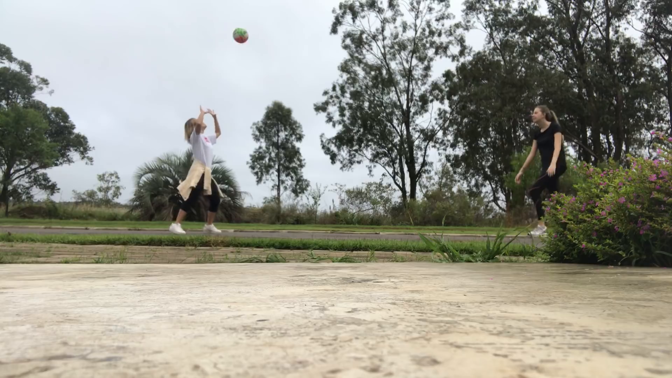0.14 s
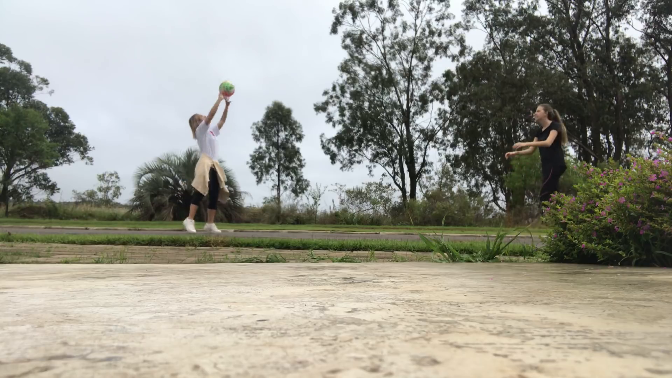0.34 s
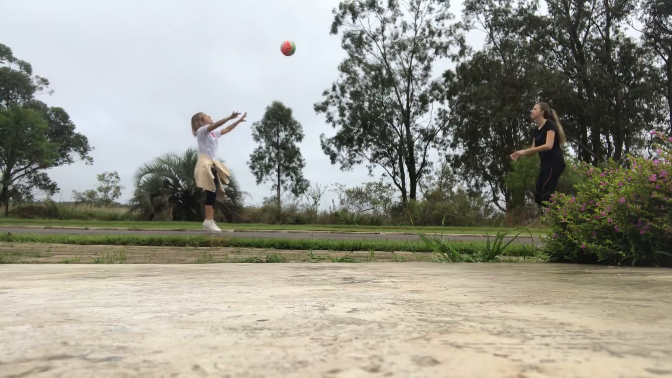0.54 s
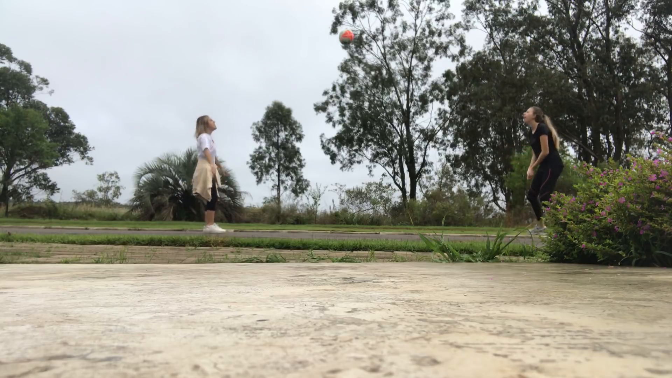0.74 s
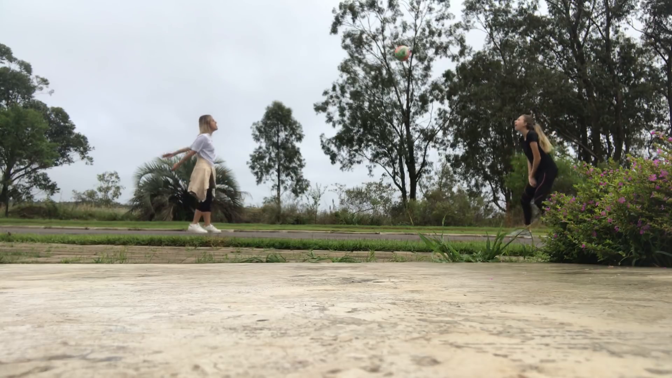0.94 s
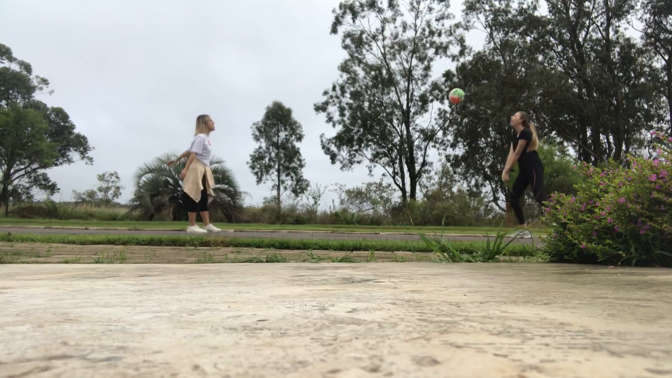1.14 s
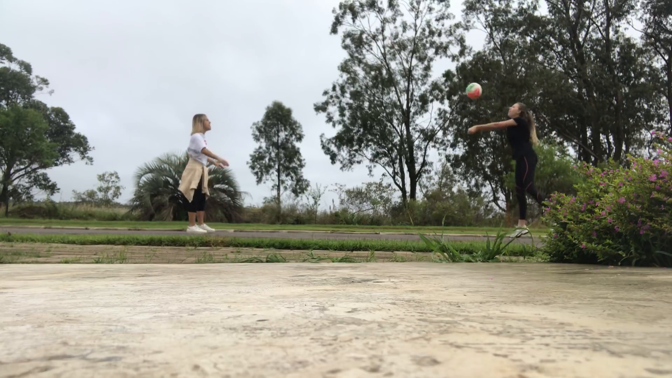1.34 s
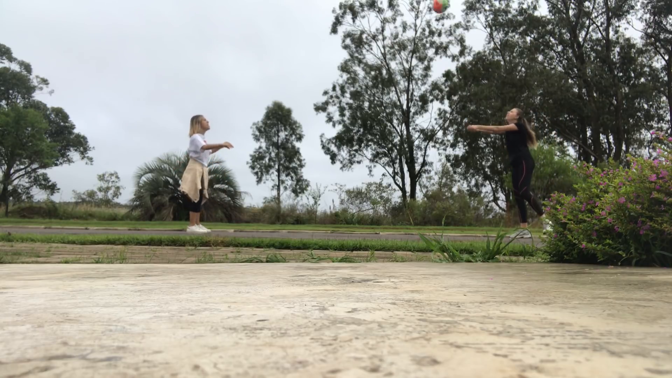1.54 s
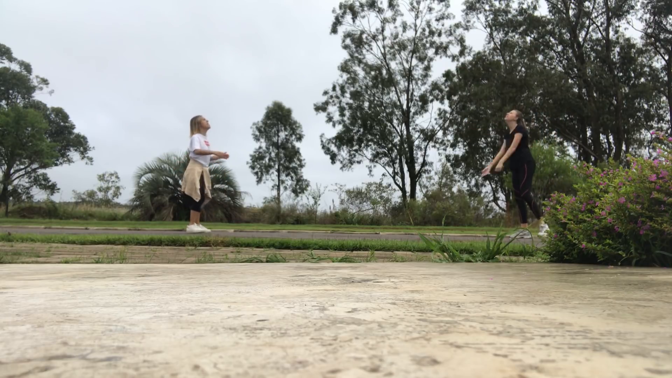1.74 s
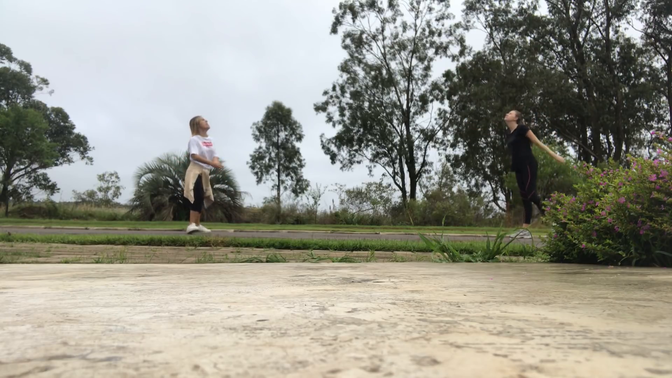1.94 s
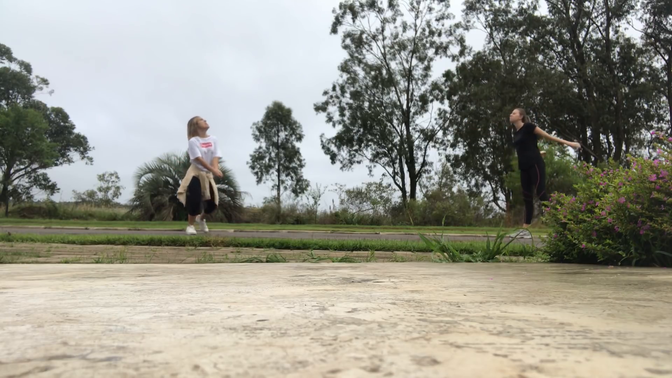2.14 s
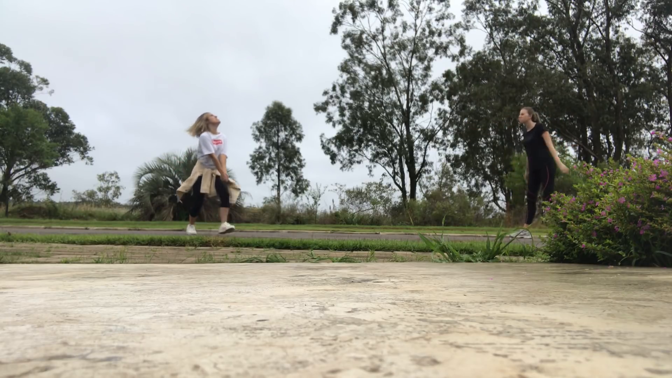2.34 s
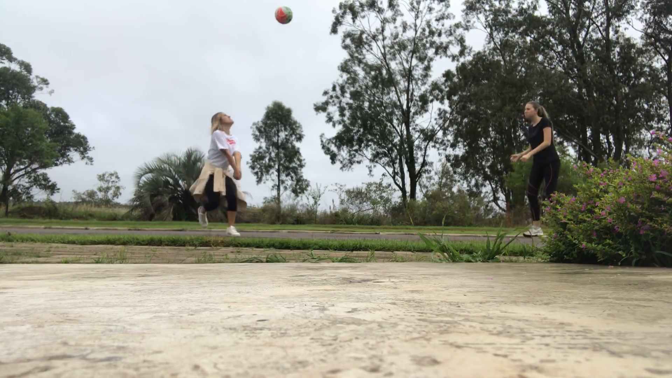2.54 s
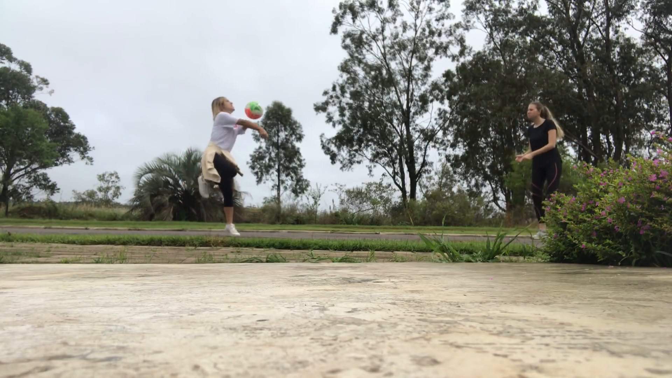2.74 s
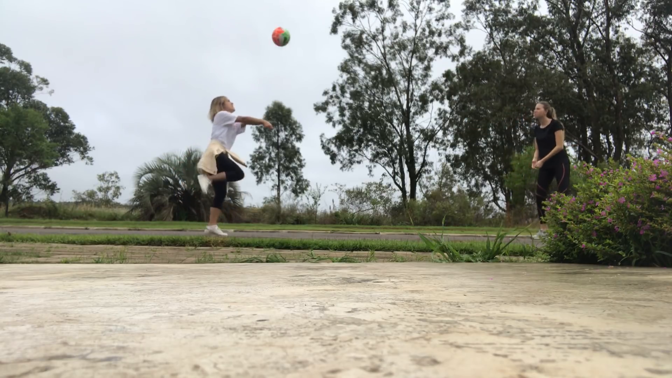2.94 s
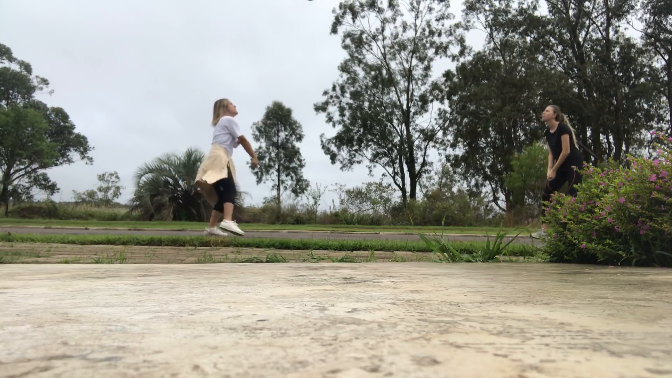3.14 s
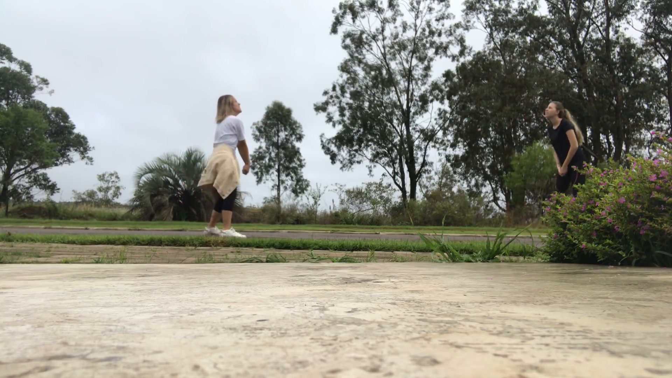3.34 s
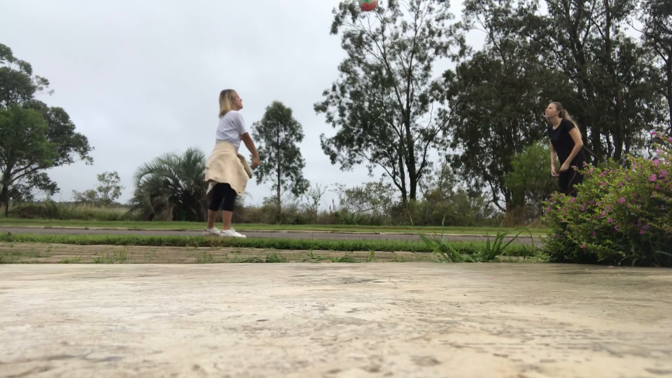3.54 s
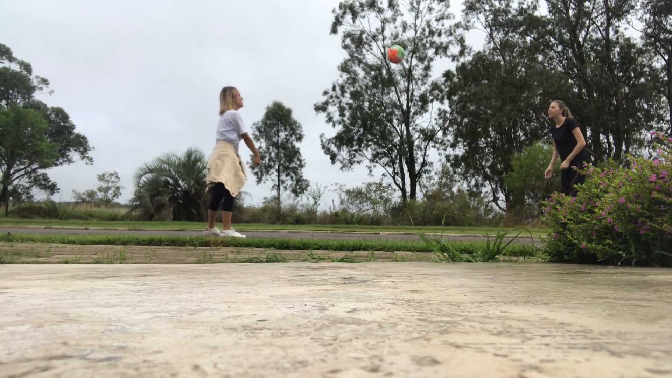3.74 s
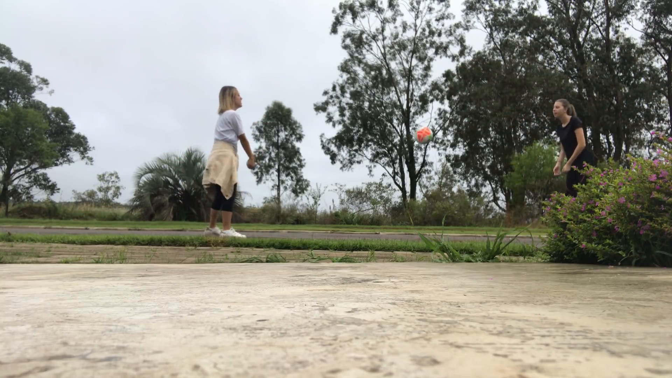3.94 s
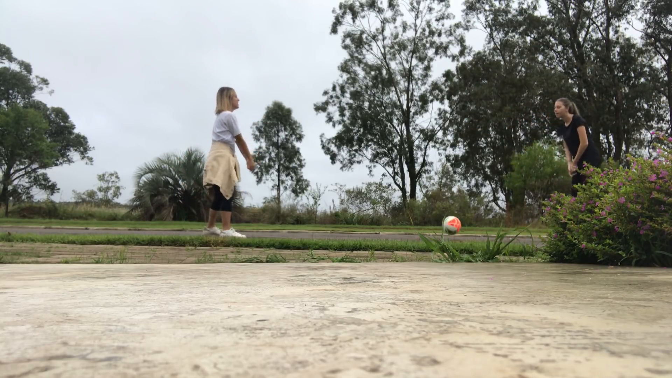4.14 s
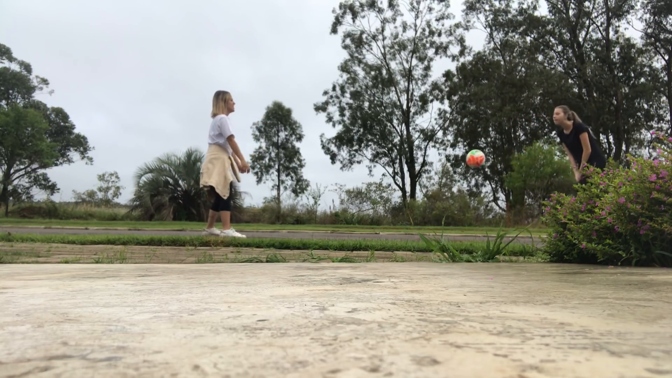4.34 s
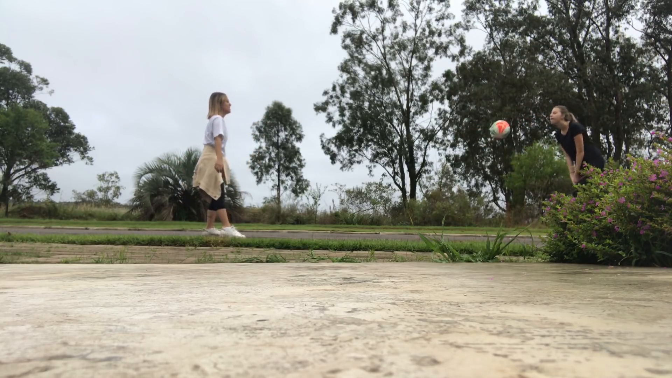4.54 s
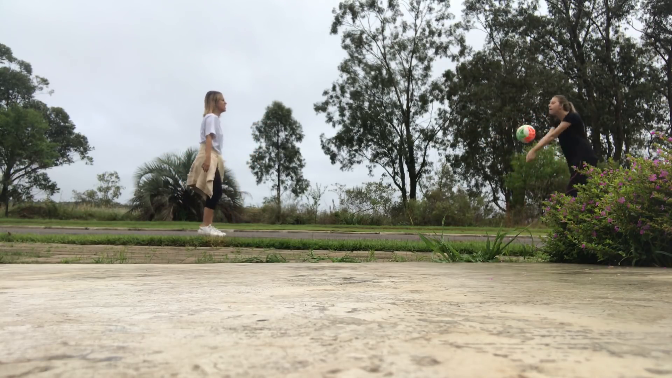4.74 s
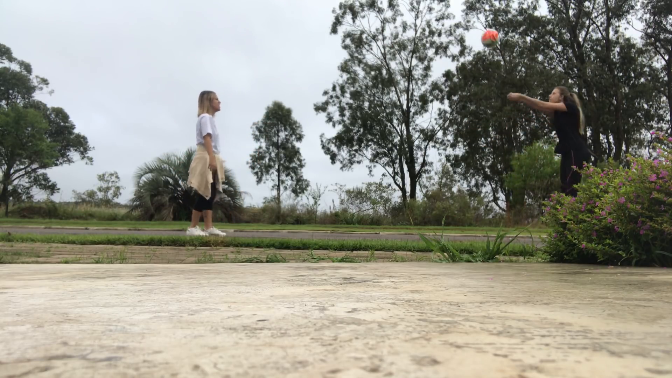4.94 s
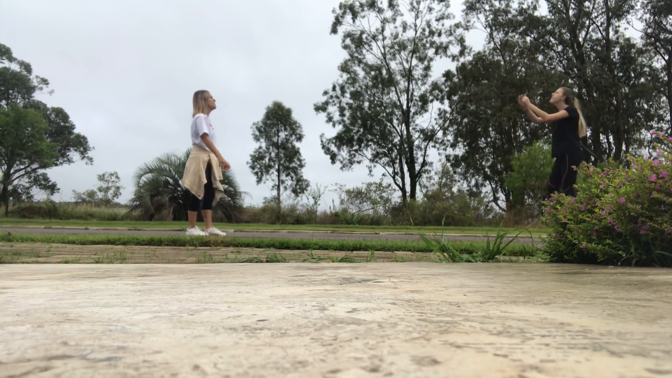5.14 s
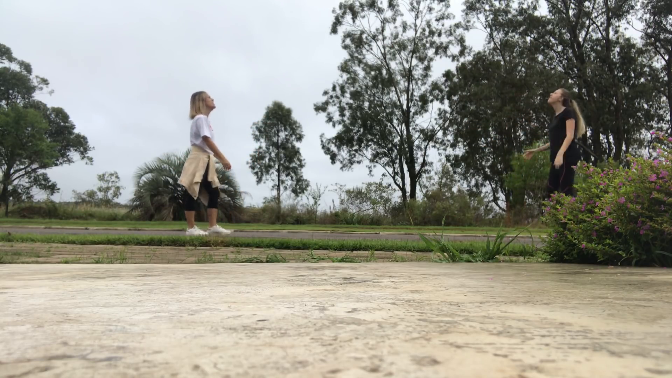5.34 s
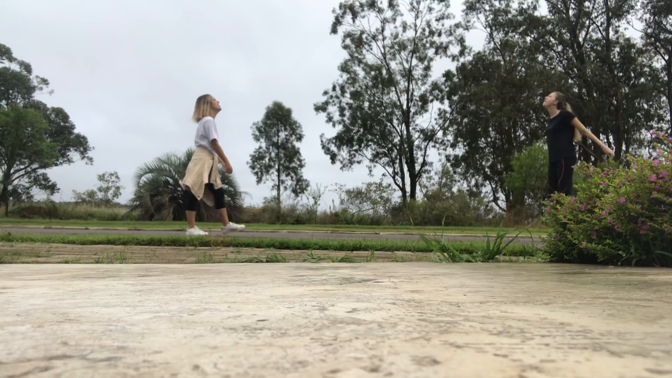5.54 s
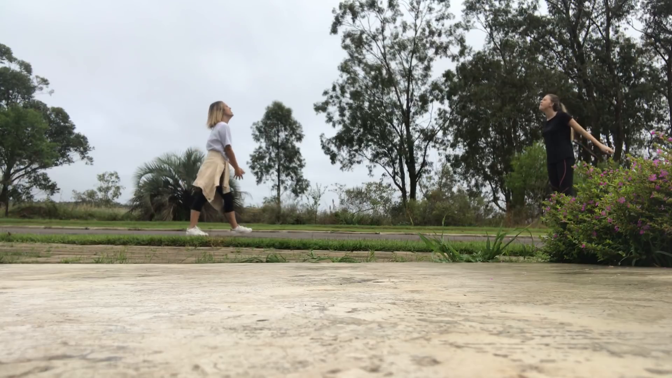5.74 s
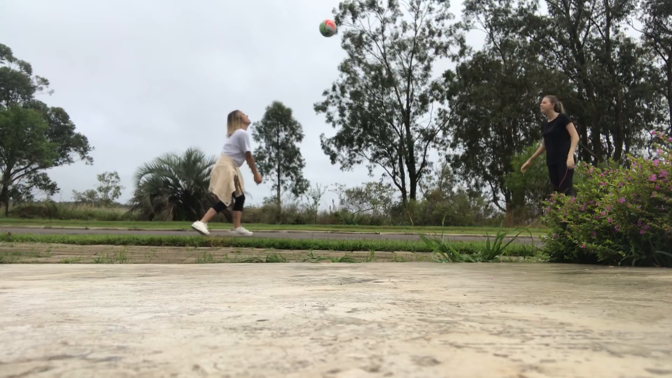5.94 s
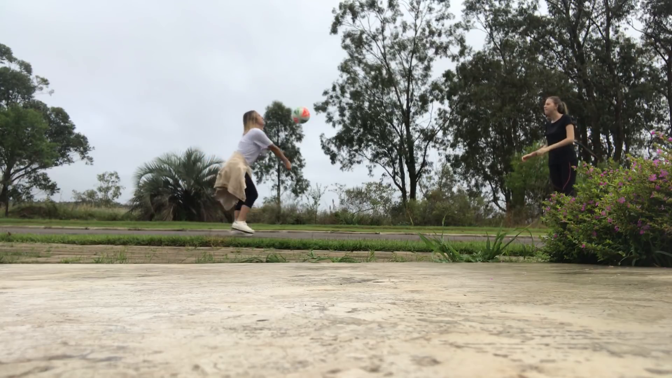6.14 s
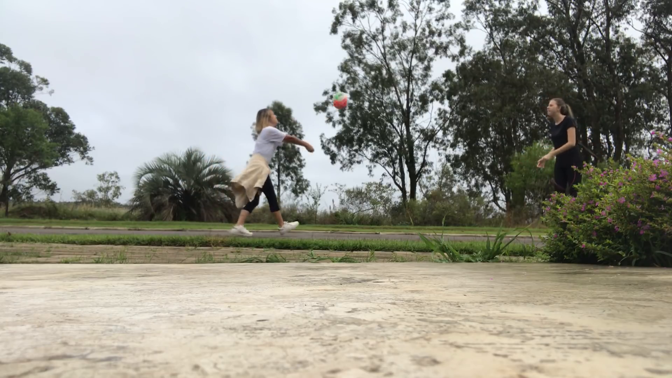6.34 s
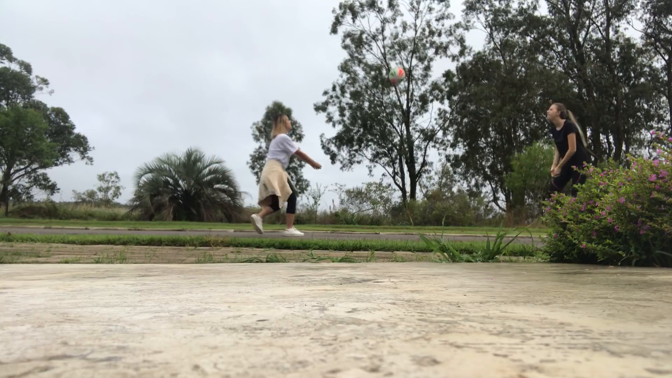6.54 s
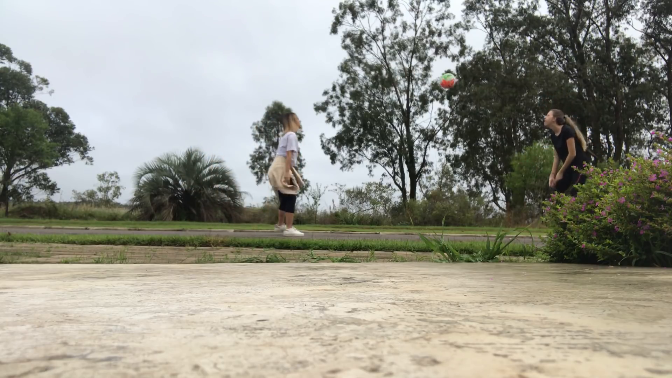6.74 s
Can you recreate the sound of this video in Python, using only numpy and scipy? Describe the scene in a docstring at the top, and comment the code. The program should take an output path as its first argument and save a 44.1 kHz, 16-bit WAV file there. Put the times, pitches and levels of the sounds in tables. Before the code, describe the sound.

Over a quiet, low outdoor rumble, a volleyball is struck six times at an easy pace: first softly by fingertips, then with sharp, thumping slaps off forearms, with a single bounce on paving midway. A nearby wall and far trees throw back brief echoes. Light, gritty footsteps fill the gaps, and thin, high bird whistles come now and then from far off.

```python
"""Volleyball on open paving

Two players pass a volleyball: a fingertip set, forearm bumps and one bounce on the ground.
Each blow slaps the skin, thumps the shell and rings the air inside; a near wall and far trees
throw it back. Shoes scuff between passes and a small bird whistles over a low outdoor rumble."""
import sys
import numpy as np
from scipy import signal
from scipy.fft import rfft, irfft
from scipy.io import wavfile
from scipy.ndimage import uniform_filter1d

SR = 44100
rng = np.random.default_rng(int(sys.argv[2]) if len(sys.argv) > 2 else 0)


def dump(signal):
    """Clip the signal to [-1, 1] and save it as 16-bit WAV at the path in sys.argv[1]."""
    limited = np.clip(np.atleast_2d(signal).T, -1, 1)
    pcm = np.round(limited * 32767).astype(np.int16)
    wavfile.write(sys.argv[1], SR, pcm)


N = 304290

# tone of the outdoor bed and of the lingering hiss: (frequency [Hz], level [dB])
RUMBLE_EQ = [(13, -71), (22, -33.5), (40, -12.5), (59, 1), (76, -1), (97, -6.5), (168, -12), (209, -15.5),
             (244, -16), (300, -21), (390, -49.5), (660, -120)]
AIR_EQ = [(180, -24), (300, -0.5), (404, -2.5), (477, -8.5), (665, -8.5), (812, -14.5), (974, -13.5),
          (1550, -18.5), (2090, -22), (2910, -22), (4950, -25), (6040, -24), (10400, -32), (14300, -30),
          (15800, -34)]
HISS_EQ = [(200, -2), (800, 5.5), (2000, -3), (3800, 0.5), (5000, -5), (6500, -1.5), (8500, -6),
           (10300, -10.5), (13000, -7.5), (15700, -14.5), (16300, -43.5)]
# a soft hiss hangs on after two of the passes: (start [s])
HISS_STARTS = [1.367, 6.302]
# tone of the near wall, the far echoes and the open-air tail: (frequency [Hz], level [dB])
WALL_EQ = [(60, -20), (200, -9), (400, 1), (800, 0), (1400, -2.5), (2500, -8.5), (6000, -11), (8500, -23),
           (14000, -17)]
FAR_EQ = [(50, 4), (130, -2), (300, -14), (500, -6.5), (1000, -3.5), (2200, -15), (4500, -5), (6500, -8),
          (14000, -6)]
TAIL_EQ = [(50, -7), (150, 7.5), (450, -0.5), (1000, -1.5), (2200, -2.5), (3300, 2), (4500, -4), (6500, 4),
           (14000, -1.5)]
# decay of the tail: (frequency [Hz], time to fall 60 dB [s])
TAIL_T60 = [(80, 0.85), (300, 0.78), (1000, 0.89), (3000, 1), (7000, 1), (14000, 0.71)]
# bird whistles: (time [s], length [s], start pitch [Hz], glide [octaves/s], level [dB])
WHISTLES = [(.108, .13, 7100, -3, -80), (3.29, .07, 7850, -1, -71), (3.345, .17, 7050, -3, -63.5),
            (3.362, .028, 7000, -22, -63), (3.43, .1, 6400, 1.3, -73), (3.638, .1, 10000, -3.6, -78),
            (4.625, .13, 6900, -3, -73.5), (6.06, .11, 6450, -2.7, -71), (6.826, .12, 7600, -3.5, -67)]
# the firmer footfalls: (time [s], level [dB], slide [0 planted to 1 dragged])
STEPS = [(.087, -57, .4), (.105, -61, .7), (.827, -53.5, 0), (1.003, -63, .75), (1.229, -63, .95),
         (2.202, -49, .15), (2.215, -50.5, 0), (2.484, -51.5, .65), (2.504, -50, .35), (2.533, -42.5, 0),
         (2.692, -48.5, .55), (2.739, -56, .35), (3.057, -51.5, .2), (3.154, -50, .08), (3.253, -51, .48),
         (3.396, -57, 1), (3.673, -57, .15), (4.107, -64, .8), (4.824, -61.5, .92), (6.462, -46.5, .55),
         (6.515, -46, .05), (6.78, -52.5, .35)]
# tone of the sole and of the grit under it: (frequency [Hz], level [dB])
SOLE_EQ = [(90, 7), (250, 4.5), (370, 11), (480, -3.5), (720, 5.5), (1200, -1.5), (2200, -17.5),
           (4000, -37)]
GRIT_EQ = [(800, -3), (2000, -1), (3700, 0), (5000, -7), (6500, -8), (9000, -19), (14000, -24),
           (17000, -17)]
# tone of a blow's low knock, mid crack and top-end snap: (frequency [Hz], level [dB])
KNOCK_EQ = [(100, -24), (200, -5), (300, 2.5), (390, 1), (480, -16.5), (1000, -59.5)]
CRACK_EQ = [(400, -73), (1000, -2), (1600, 0), (2100, -3.5), (3300, -3.5), (4300, -6.5), (5000, -11),
            (6000, -6.5), (7500, -17.5), (10000, -33.5), (16000, -22)]
SNAP_EQ = [(3000, -36.5), (7000, -12.5), (8800, -2), (10300, -3.5), (12500, 4), (14500, -4.5), (16500, 3)]
# the ball radiates little between its knock and its slap: (frequency [Hz], level [dB])
RADIATION_EQ = [(22, -47.5), (45, 15), (80, 2), (360, 2), (480, -4), (630, -2.5), (1500, -1.5)]
# air modes inside the ball: (frequency [Hz], level [dB], time to fall 60 dB [s])
AIR_MODES = [(1868, 4, .13), (2496, 3, .22), (3125, 4, .13), (3266, -3, .4), (3281, -8, .4),
             (3730, -11, .14), (4008, -7, .14), (4330, -11, .18)]
# what the ball meets, by name: (thump base pitch [Hz], knock [dB re force], knock delay [s],
#   second contact delay [s], second contact [dB re slap], wall echo [dB re the blow's echoes])
SURFACES = {"fingers": (86, -1, .0026, .0036, -3, -1), "forearms": (77.5, -16.5, .0009, .0023, -8, -1),
            "paving": (88, -8.5, .0034, .0069, -2, -8.5)}
# blows on the ball, each layer relative to the force: (time [s], surface, force [dB], slap [dB],
#   slap pitch [Hz], crack [dB], snap [dB], upper pings [dB], echoes [dB], wall delay [s])
BLOWS = [(0.3906, "fingers", -24, -3, 1080, -10, -13.5, -29.5, -5.5, .014),
         (1.3603, "forearms", -16, -12.5, 1520, -5, -16, -30, -1.5, .014),
         (2.8493, "forearms", -13, -10.5, 1000, -11, -16, -35, -6, .0138),
         (4.2146, "paving", -14.3, -5.5, 880, -6.5, -21, -34, -2.5, .0112),
         (4.8593, "forearms", -19.2, -12, 760, -8, -20.5, -52, -2, .0122),
         (6.2946, "forearms", -13.5, -4, 1130, -7.5, -27, -32.5, -8.5, .0126)]


def amp(db):
    """Decibels to gain."""
    return 10 ** (np.asarray(db) / 20)


def unit_rms(x):
    """Scales a sound to an rms of 1."""
    return x / np.sqrt(np.mean(x ** 2) + 1e-20)


def burst(x):
    """Gives a short sound the energy of five milliseconds at an rms of 1."""
    return x / np.sqrt(np.sum(x ** 2) / (.005 * SR) + 1e-20)


def curve_at(points, hz):
    """Reads a curve along a logarithmic frequency axis."""
    knots_hz, values = np.transpose(points)
    return np.interp(np.log(hz + 1), np.log(knots_hz + 1), values)


def add(mix, start_s, sound):
    """Lays a sound into the mix."""
    part = mix[max(round(start_s * SR), 0):][:len(sound)]
    part += sound[:len(part)]


def colour(x, eq, size=4096):
    """Minimum-phase EQ, so nothing rings ahead of an attack."""
    log_gain = np.log(amp(curve_at(eq, abs(np.fft.fftfreq(size, 1 / SR)))))
    response = np.exp(np.conj(signal.hilbert(log_gain)))
    taps = np.fft.ifft(response).real[:size // 2]
    return signal.oaconvolve(x, taps * signal.windows.tukey(size)[size // 2:])[:len(x)]


def noise(eq, count):
    """Steady coloured noise with an rms of 1."""
    gain = amp(curve_at(eq, np.fft.rfftfreq(count, 1 / SR)))
    return unit_rms(irfft(rfft(rng.standard_normal(count)) * gain, count))


def blur(power, hz, octaves):
    """Averages a power spectrum over neighbouring frequencies."""
    pitch = np.log2(hz + hz[1])
    weight = np.exp(-((pitch[:, None] - pitch) / octaves) ** 2)
    return weight @ power / weight.sum(1).reshape((-1,) + (1,) * (power.ndim - 1))


def flat_burst(envelope, size=1024):
    """A burst of noise, evenly spread over all frequencies."""
    x = envelope * rng.standard_normal(len(envelope))
    hz = np.fft.rfftfreq(size, 1 / SR)
    power = blur(abs(rfft(x, size)) ** 2, hz, octaves=.15)
    flatten_db = -10 * np.log10(power + power.mean() / 20)
    return burst(colour(x, np.column_stack([hz, flatten_db])))


def diffuse(x, eq, envelope, size=512):
    """Scattering: the energy of x, smeared by envelope(delay, hz), comes back as fresh noise."""
    frames = dict(fs=SR, nperseg=size, noverlap=size * 3 // 4)
    hz, t, spectrum = signal.stft(x, **frames)
    spread = envelope(t[None, :size // 2], hz[:, None]) ** 2 * np.ones((len(hz), 1))
    spread /= spread.sum(1, keepdims=True)
    power = blur(abs(spectrum) ** 2, hz, octaves=.2)
    power = signal.fftconvolve(power, spread, axes=1)[:, :len(t)]
    fresh = signal.stft(rng.standard_normal(len(x)), **frames)[2]
    wash = np.sqrt(abs(power)) * amp(curve_at(eq, hz))[:, None] * fresh / fresh.std()
    return signal.istft(wash, **frames)[1][:len(x)]


def outdoor_bed(rumble_db=-53.5, air_db=-65, hiss_db=-61.5, hiss_s=.4, sag_db=4):
    """Low rumble and faint air, with the hiss that lingers after two passes."""
    out = amp(rumble_db) * noise(RUMBLE_EQ, N) + amp(air_db) * noise(AIR_EQ, N)
    fade = amp(hiss_db - sag_db * np.linspace(0, 1, round(hiss_s * SR)))
    for start in HISS_STARTS:
        add(out, start, fade * noise(HISS_EQ, len(fade)))
    return out


def open_air_tail(x, build_s=.03):
    """A thin reverb that blooms, each band dying at its own speed."""
    def bloom(t, hz):
        return (1 - np.exp(-t / build_s)) * amp(-60 * t / curve_at(TAIL_T60, hz))
    return diffuse(x, TAIL_EQ, bloom)


def far_echoes(x, first_s=.075, second_s=.1504, bass_s=.064):
    """Two smeared echoes from distant buildings and trees; the long waves come back in one piece."""
    def arrivals(t, hz):
        first = np.exp(-((t - first_s) / .024) ** 2)
        second = np.exp(-((t - second_s) / .012) ** 2)
        return first + amp(-7) * second
    echo = diffuse(x, FAR_EQ, arrivals)
    add(echo, bass_s, colour(x, [(150, 2.5), (400, -8.5), (2000, -30)]))
    return echo


def bird(waver=.0099, flutter=.25, tail_db=-9):
    """Thin, unsteady whistles that glide, mostly down, from far off among the trees."""
    out = np.zeros(N)
    for start, length, start_hz, glide, db in WHISTLES:
        progress = np.linspace(0, 1, round(length * SR))
        drift = unit_rms(uniform_filter1d(rng.standard_normal(len(progress)), size=200))
        throb = unit_rms(uniform_filter1d(rng.standard_normal(len(progress)), size=200))
        hz = start_hz * 2 ** (glide * length * progress) * (1 + waver * drift)
        envelope = np.sqrt(4 * progress * (1 - progress)) * (1 + flutter * throb)
        add(out, start, amp(db) * envelope * np.sin(2 * np.pi * np.cumsum(hz) / SR))
    return out + amp(tail_db) * open_air_tail(out)


def shoes(step_s=.0075, drag_s=.028, grain_db=4, shuffles_per_s=.9, shuffle_db=-71):
    """A dull pat of the sole and a crunch of grit; a sliding foot is longer and grittier."""
    out, t = np.zeros(N), np.arange(SR // 4) / SR
    # faint shifts of weight among the firmer steps
    draws = rng.random((round(shuffles_per_s * N / SR), 2))
    shuffles = [(when * N / SR, shuffle_db, slide) for when, slide in draws]
    for start, db, slide in STEPS + shuffles:
        age = t / (step_s + drag_s * slide ** 4)
        envelope = 2 * np.sqrt(age) * np.exp(-age ** 2) + .18 * np.exp(-age / 3.5)  # land, settle
        grains = rng.standard_normal(len(t)) * amp(grain_db * rng.exponential(1, len(t)))
        grit = amp(-20 + 21 * slide) * unit_rms(colour(grains, GRIT_EQ))
        sole = amp(-7 * slide ** 2) * noise(SOLE_EQ, len(t))
        add(out, start, amp(db) * envelope * (sole + grit))
    return out


def air_pings(t, slap_db, upper_db):
    """The air inside the ball pings; slap, force and each blow's upper-ping level set the loudness."""
    # the lowest mode follows the slap, the second only the force
    drives_db = [slap_db - 20, -32.5] + [upper_db] * (len(AIR_MODES) - 2)
    return sum(amp(drive + db - 60 * t / t60) * np.sin(2 * np.pi * hz * t)
               for drive, (hz, db, t60) in zip(drives_db, AIR_MODES))


def shell_thump(t, hz, stiffening=2.43, relax_s=.0042, lag_s=.0015, rise_s=.0009):
    """The shell flattens and springs back: about three swings, slowing as the contact eases."""
    age = np.maximum(t - lag_s, 0)
    cycles = hz * (age + stiffening * relax_s * (1 - np.exp(-age / relax_s)))
    envelope = (1 - np.exp(-age / rise_s)) * np.exp(-(age * hz / 1.42) ** 3)
    return envelope * np.sin(2 * np.pi * cycles)


def contact_crack(t, eq, attack_s=.00011, decay_s=.001, linger_s=.0093):
    """A sharp first touch, then a crackle as the contact patch spreads."""
    click = .79 * burst(1. * (t == 0))
    decay = np.exp(-t / decay_s) + .07 * np.exp(-t / linger_s)
    crackle = flat_burst((1 - np.exp(-t / attack_s)) * decay)
    return burst(colour(click + crackle, eq))


def slap(t, hz, swell_cycles=.52, roughness=.55, linger_s=.004, lag_s=.0005):
    """Just after the touch, air squeezed out between ball and skin rings for a few cycles."""
    peak_s = swell_cycles / hz
    envelope = t / peak_s * np.exp(-t / peak_s)
    tone = burst(envelope * np.sin(2 * np.pi * hz * t))
    puff = flat_burst(envelope + .1 * np.exp(-t / linger_s))
    puff = burst(colour(puff, [(400, -21), (650, 6.5), (1500, -12), (2400, -16), (6000, -24)]))
    return np.interp(t - lag_s, t, burst(tone + roughness * puff), left=0)


def volleyball(far_db=-14):
    """Every blow with its second contact and its echoes; all layers grow with the force."""
    out, t = np.zeros(N), np.arange(SR // 2) / SR
    for start, surface, force_db, slap_db, slap_hz, crack_db, snap_db, ping_db, echo_db, wall_s in BLOWS:
        thump_hz, knock_db, knock_s, second_s, second_db, wall_db = SURFACES[surface]
        hit = amp(crack_db) * contact_crack(t, CRACK_EQ)
        hit += amp(snap_db) * contact_crack(t, SNAP_EQ)
        hit += amp(slap_db) * slap(t, slap_hz)
        # the shell dents inwards, so the knock starts with a suck
        add(hit, knock_s, -amp(knock_db) * burst(colour(1. * (t == 0), KNOCK_EQ)))
        # the other arm, or the flattening shell, lands a moment later and softer
        add(hit, second_s, amp(slap_db + second_db) * slap(t, slap_hz))
        hit = colour(hit, RADIATION_EQ) + shell_thump(t, thump_hz)
        pings = air_pings(t, slap_db, ping_db)
        echoes = amp(echo_db + far_db) * far_echoes(hit)
        add(out, start, amp(force_db) * (hit + pings + echoes))
        # the wall's slapback comes in upside down and hollows out the thump
        add(out, start + wall_s, -amp(force_db + echo_db + wall_db) * colour(hit, WALL_EQ))
    return out


def scene(low_cut_hz=33, tail_db=-24):
    """Game and bird, thinned in the deep bass by the microphone, over the outdoor bed; mono."""
    play = volleyball() + shoes() + bird()
    low_cut = signal.butter(3, low_cut_hz, "highpass", fs=SR, output="sos")
    play = signal.sosfiltfilt(low_cut, play)
    return (play + amp(tail_db) * open_air_tail(play) + outdoor_bed())[None]


def record(dry):
    """A steep high cut at 16.5 kHz."""
    high_cut = signal.firwin(255, 16500, window=("kaiser", 9), fs=SR)
    return signal.oaconvolve(dry, high_cut[None], "same")


dry = scene()
out = record(dry)
dump(out)
```